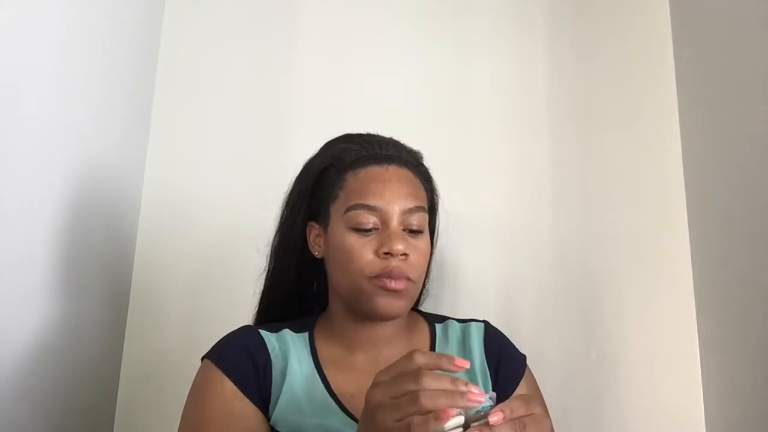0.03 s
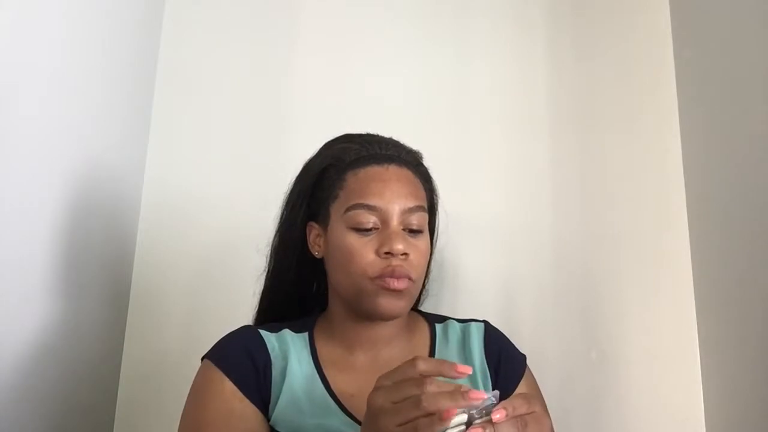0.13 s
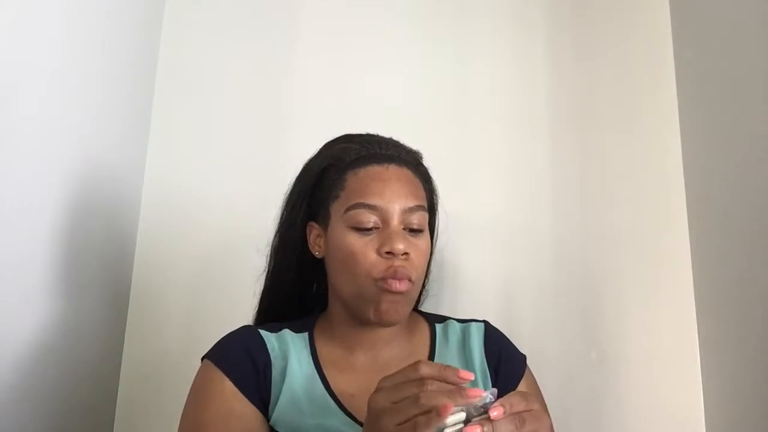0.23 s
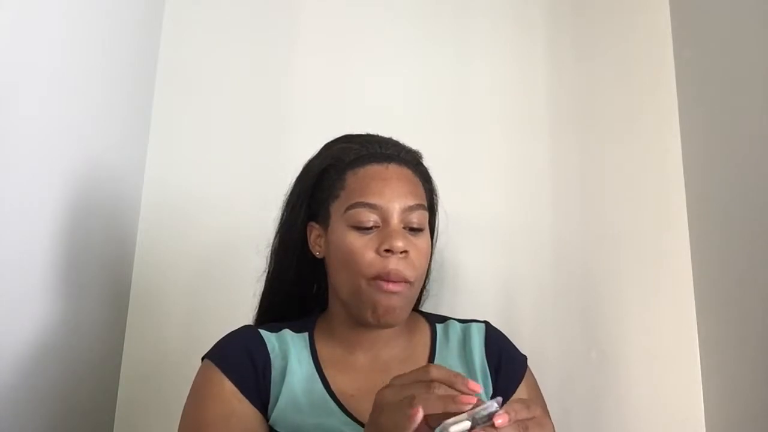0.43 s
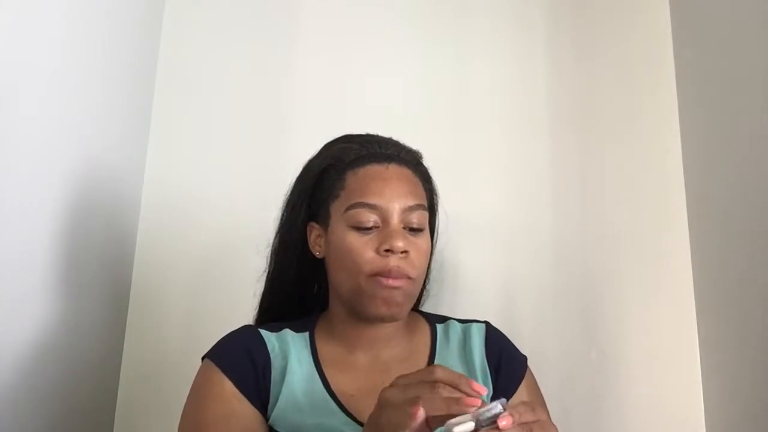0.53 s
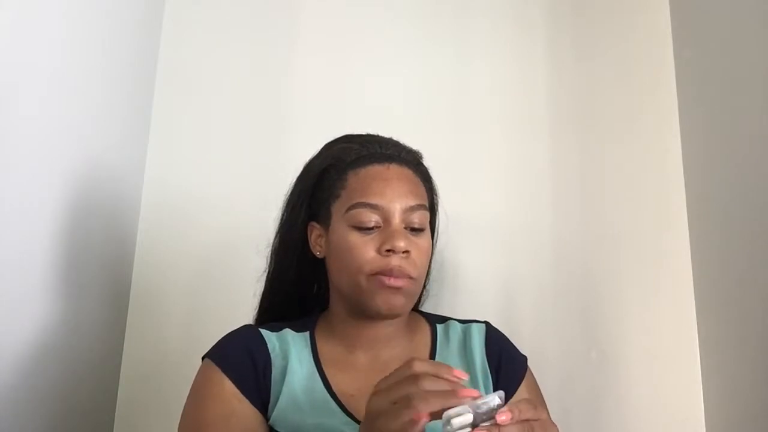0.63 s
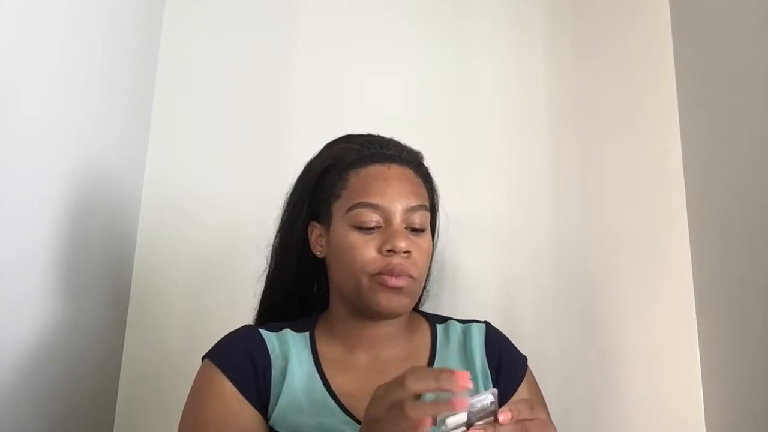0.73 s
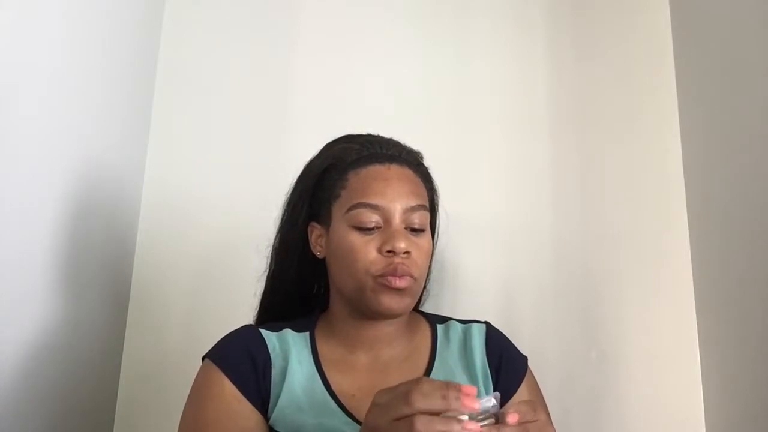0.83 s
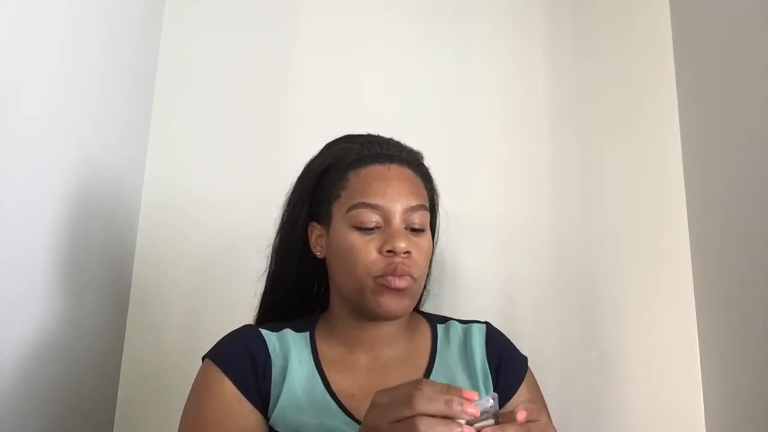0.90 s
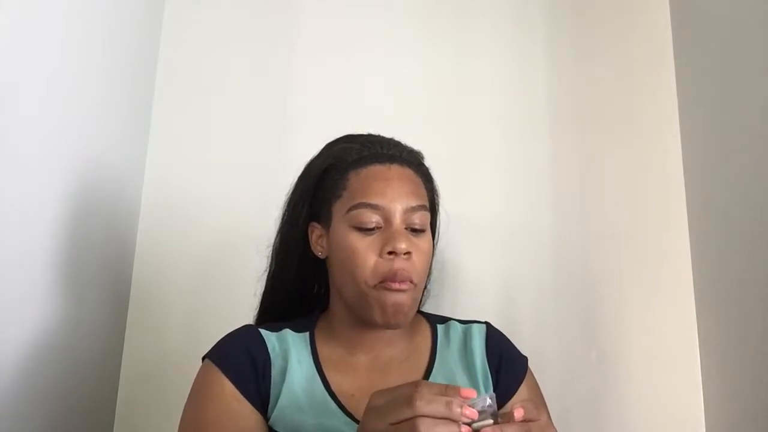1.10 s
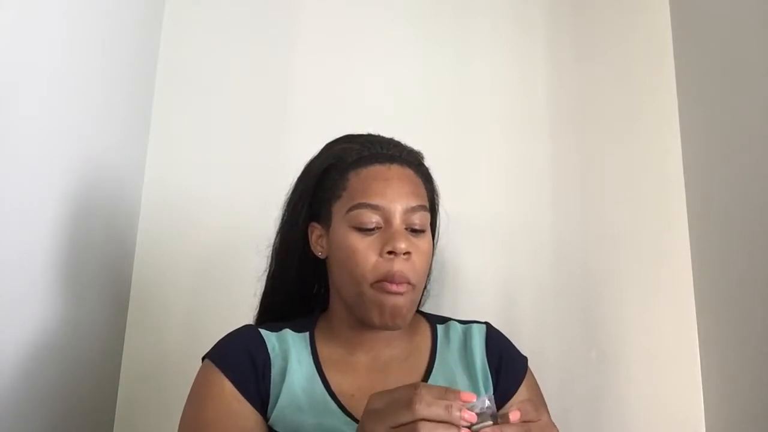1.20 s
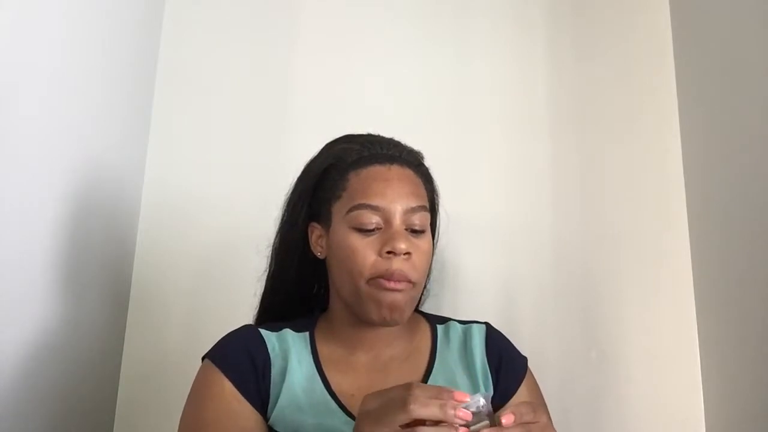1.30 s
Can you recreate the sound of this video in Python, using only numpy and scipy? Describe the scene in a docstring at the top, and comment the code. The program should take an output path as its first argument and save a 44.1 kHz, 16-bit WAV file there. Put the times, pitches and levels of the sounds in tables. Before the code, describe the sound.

Fingers press a plastic and foil pack, its domes buckling in a rapid early burst, then one crisp snap and a final tight pair, with tiny crinkles, short bright room reflections and a faint low rumble.

```python
"""A small, bare room, close to the microphone: fingers press pellets out of a plastic and foil blister pack.
Domes buckle with sharp snaps: noise bursts ring through resonances of their own. Small clicks are creases of
the sheet; showers of grains are foil crinkles and, at the start, the fading end of an earlier sound; two dull
thuds come from handling. Near walls return snaps, clicks and grains as echoes and a tail, over shaped noise and
wavering hums."""
import sys
import numpy as np
from scipy import signal
from scipy.fft import rfft, irfft, next_fast_len
from scipy.io import wavfile

SR = 44100
rng = np.random.default_rng(int(sys.argv[2]) if len(sys.argv) > 2 else 0)


def master_out(mix):
    """Clip the mix to full scale and print it as 16-bit PCM to the path in sys.argv[1]."""
    frames = np.transpose(np.atleast_2d(mix))
    ceiling = np.clip(frames, -1, 1)
    pcm = np.round(ceiling * 32767).astype(np.int16)
    wavfile.write(sys.argv[1], SR, pcm)


N = 59535
TIME = np.arange(N) / SR  # s

# Rumble spectrum, shape only: (frequency [Hz], relative density [dB])
RUMBLE_SPECTRUM = [(25, -29), (40, -25), (55, 1.5), (75, -5), (120, 1.5), (165, -3), (245, -1.5), (330, -3),
                   (380, -7.5), (450, -17), (700, -23.5), (1500, -37)]
# Slow rise and fall of the rumble: (time [s], level change [dB])
RUMBLE_SWELL = [(0, 1), (.2, 0), (.3, 1), (.41, -0.5), (.5, 1), (.75, .5), (1.1, -1), (1.35, 0.5)]
# Hiss spectrum, shape only: (frequency [Hz], relative density [dB])
HISS_SPECTRUM = [(300, -3), (700, 1), (1200, 6), (2500, -2), (5000, -6.5), (10000, -14.5), (15000, -31)]
# Low hums of wavering strength: (frequency [Hz], level [dB])
HUMS = [(47, -62.5), (239, -68)]
RUMBLE_DB, HISS_DB = -57.5, -69
HUM_WAVER, HUM_WAVER_HZ = 0.17, 6.8  # rms share of the level; fastest full-strength waver

# Colour of the plastic and foil: (frequency [Hz], relative level [dB])
PACK_COLOUR = [(150, -31), (500, -19.5), (900, -18.5), (1500, -10.5), (2400, -7.5), (3300, -0.5), (5500, 0),
               (7200, 0), (10000, -1.5), (13500, -2), (16000, -18)]
# The bass lift holds below the first frequency, the treble lift above the last
BASS_FULL_HZ, NEUTRAL_HZ, TREBLE_FULL_HZ = 835, 3340, 13120

# Foil crinkles, and at the start the fading end of an earlier sound:
# (start [s], length [s], level [dB], treble [dB])
CRINKLES = [(0, 0.057, -71.5, 7), (0.127, 0.021, -62.5, 6), (0.551, 0.013, -70, 2), (0.66, .016, -53.5, 5),
            (0.871, 0.014, -60, 0), (0.923, .014, -56.5, 3), (1.012, 0.011, -56.5, 1),
            (1.338, .04, -64, -2)]
GRAINS_PER_S, GRAIN_SPREAD_DB, CRINKLE_EDGE_S = 9900, 4.5, 0.0024

# Small clicks: creases of the sheet: # (time [s], level [dB], energy share of the first break [0-1], treble
# [dB], # resonance [Hz], its height [dB])
SMALL_CLICKS = [ (0.0148, -43, .6, -15, 5960, -3), (.1170, -35, 0.56, 10, 5400, 6),
                (0.159, -30.5, 0.3, 3, 5500, 15), (0.173, -27.5, 0, 1, 4290, 25),
                (0.1842, -34, 0.5, -6, 5600, 9), (.2042, -25, .7, -7, 5130, 4),
                (.2180, -33, 0.3, -5, 5850, 0), (0.2433, -21, 0.27, 2, 8640, 13),
                (0.2677, -30, 1, -8, 4570, -5), (0.2714, -14.5, .4, 30, 5900, 2),
                (0.3017, -32, .3, -3, 8100, 11), (.5610, -43.5, 0.3, 4, 9060, 25),
                (0.6123, -40.5, 0.5, 11, 8600, 14), (0.6196, -32.5, 0.1, -22, 3000, 15),
                (.6297, -24, .05, -11.5, 3330, 12), (.6393, -34.5, 0.05, 0, 3500, 5),
                (0.8386, -32.5, 0.05, -17, 5500, 8), (0.8855, -24, 0.98, -6, 1970, 5),
                (0.8953, -43, 0, -8, 3400, 27), (0.9259, -32.5, 0, 2, 7200, 23),
                (.9825, -44, .5, -8, 3400, 9), (1.0077, -33, 0, 5, 8000, 0), (1.0487, -27, .3, 3, 4700, -6),
                (1.0507, -24, 0.25, 12, 6520, 18), (1.2163, -32, 0.1, -15, 2274, 14.5),
                (1.2702, -48, 0.8, -24, 4700, 30), (1.3199, -37.5, 0, -22, 3330, 6)]
# Peaks and dips of the flat sheet, in every small click: (frequency [Hz], width [Hz], height [dB])
SHEET_RESONANCES = [(2200, 300, 2), (3340, 160, 4.5), (4080, 550, -4), (5030, 510, 3.5), (5720, 250, 2.5),
                    (7640, 700, -4.5), (8700, 400, 5)]
BREAK_S = 0.000237  # decay of the first break
SMALL_CRUMPLE_S, SMALL_WIDTH_HZ = 0.0013, 190

# Near surfaces: (delay [s], level [dB])
ECHOES = [(.0017, -4.5), (.0030, -14), (.0057, -15), (.0094, -7), (0.0102, -7.5), (0.0137, -9.5)]
# Reverberation: (frequency [Hz], time to fall 60 dB [s])
ROOM_T60 = [(500, 0.25), (2200, 0.39), (5500, 0.29), (10000, 0.31), (15000, .3)]
ECHO_SMEAR_S = 0.00097
TAIL_DB, TAIL_START_S, TAIL_BUILD_S = -2.5, 0.0026, 0.0027
SMALL_WALLS_DB = -1  # small clicks and crinkles sent to the walls

# Buckling domes: (time [s], level [dB], crumple decay [s], energy share of the first break [0-1],
#                  level sent to the walls, relative [dB], bass [dB], treble [dB],
#                  peaks and dips as (frequency [Hz], width [Hz], height [dB]))
SNAPS = [ (0.1378, -19, 0.0012, 0.27, 0.5, 0.5, 1.5, [(1930, 270, 10), (2660, 1200, -21), (5520, 490, 10.5),
         (6900, 230, 6.5), (9450, 350, 5), (12000, 1150, 11)]),
         (.1983, -16.5, .0013, 0.33, -3, -9, 9, [(3700, 610, 16), (5170, 700, 1), (12400, 600, 0)]),
         (.2079, -10, 0.0025, 0.22, 0.5, 5.5, 15, [(1460, 160, 15), (1930, 620, -14), (3260, 340, 16),
         (5700, 600, 10), (12700, 400, 3)]), (0.2294, 0, 0.00077, 0.68, -3, -7, -2.5, [(3470, 500, 1),
         (4740, 290, 3), (5690, 570, 13), (7040, 1300, -11), (11640, 1400, 9.5)]),
         (0.2901, -7, 0.00067, .25, 0.5, 6, 4.5, [(550, 73, 6.5), (1000, 470, -3.5), (3430, 400, -4.5),
         (5850, 1100, 5), (6450, 340, -7), (8050, 360, 14), (13200, 1600, 11)]),
         (0.3542, -11, 0.0025, 0.029, -1, -0.5, -5, [(1114, 39, 10), (1505, 63, 6.5), (1940, 310, 11),
         (2213, 160, 13.5), (2680, 1900, -41), (3645, 140, 12.5), (3900, 250, 2.5), (4680, 400, 6),
         (6340, 150, 13.5)]), (.6732, -9, 0.0046, 0.099, -1, -6.5, 9.5, [(1480, 24, 19), (2570, 240, 11),
         (4040, 250, 5.5), (4520, 390, -15), (5620, 480, 7), (11600, 450, 5.5)]),
         (1.0251, -17, 0.003, 0.19, 0, -4, 2.5, [(2460, 410, 11), (4500, 430, 7), (6640, 350, 12.5)]),
         (1.0266, -11, 0.0036, 0.44, -0.5, -5, 6, [(930, 120, 18.5), (1920, 500, 5), (3100, 450, 6),
         (3940, 400, -10), (4450, 390, 9.5), (6480, 200, 6), (8400, 320, 5)])]

# Soft low thuds while the pack is handled: (time [s], level [dB], band centre [Hz])
THUDS = [(0.293, -27.5, 61.3), (.385, -24.5, 209)]
THUD_S, THUD_SPREAD = 0.036, 1.7  # decay; frequency ratio between points of the band

CUTOFF_HZ = 15300


def from_db(db):
    """Decibels to gain."""
    return 10 ** (np.asarray(db) / 20)


def unit(x):
    """Scale to energy one."""
    return x / np.sqrt(np.sum(x ** 2) + 1e-20)


def at_hz(points, hz):
    """Read a table on a log-frequency axis."""
    table_hz, value = np.transpose(points)
    return np.interp(np.log(np.maximum(hz, 1)), np.log(table_hz), value)


def steady_noise(points):
    """Noise with a given spectrum, rms one."""
    gain = from_db(at_hz(points, np.fft.rfftfreq(N, 1 / SR)))
    spectrum = rfft(rng.standard_normal(N)) * gain
    return np.sqrt(N) * unit(irfft(spectrum, N))


def background():
    """Room noise: swelling rumble, faint hiss, and hums whose strength wavers at random."""
    swell_db = np.interp(TIME, *np.transpose(RUMBLE_SWELL))
    rumble = from_db(RUMBLE_DB + swell_db) * steady_noise(RUMBLE_SPECTRUM)
    hiss = from_db(HISS_DB) * steady_noise(HISS_SPECTRUM)
    out = rumble + hiss
    for hz, db in HUMS:
        waver = 1 + HUM_WAVER * steady_noise([(HUM_WAVER_HZ, 0), (HUM_WAVER_HZ * 10, -80)])
        tone = np.sqrt(2) * np.sin(2 * np.pi * (hz * TIME + rng.random()))  # rms one
        out += from_db(db) * waver * tone
    return out


def colour(x, points):
    """Causal (minimum-phase) filter that follows a spectrum."""
    size = 2 * next_fast_len(len(x))
    gain = from_db(at_hz(points, np.fft.rfftfreq(size, 1 / SR)))
    cepstrum = irfft(np.log(gain))
    # Folding the cepstrum forward in time leaves no sound before the impulse
    cepstrum[1:size // 2] *= 2
    cepstrum[size // 2 + 1:] = 0
    return irfft(rfft(x, size) * np.exp(rfft(cepstrum)))[:len(x)]


def shelves(x, bass_db, treble_db):
    """Lift or lower both ends of the spectrum."""
    return colour(x, [(BASS_FULL_HZ, bass_db), (NEUTRAL_HZ, 0), (TREBLE_FULL_HZ, treble_db)])


def crinkles():
    """Foil crinkles, and an earlier sound's fading end: dense, uneven impulses coloured by the pack."""
    out = np.zeros(N)
    for s, length_s, db, treble_db in CRINKLES:
        size_db = GRAIN_SPREAD_DB * np.minimum(rng.exponential(1, N), 4)
        sizes = from_db(size_db) * rng.choice([-1, 1], N)
        impulses = sizes * (rng.random(N) < GRAINS_PER_S / SR)
        grains = shelves(colour(impulses, PACK_COLOUR), 0, treble_db)
        time_to_edge = np.minimum(TIME - s, s + length_s + CRINKLE_EDGE_S - TIME)
        envelope = np.clip(time_to_edge / CRINKLE_EDGE_S, 0, 1)
        out += from_db(db) * np.sqrt(N) * unit(grains) * envelope
    return out


def burst(decay_s, size=2048):
    """Dying noise with a nearly even spectrum, energy one."""
    envelope = np.exp(-TIME[:size] / max(decay_s, 1 / SR))
    x = rng.standard_normal(size) * envelope
    # Alternate between a flat spectrum and a ceiling that dies away
    for _ in range(6):
        x = irfft(np.exp(1j * np.angle(rfft(x))))
        ceiling = envelope * np.std(x[:16]) * 2
        x = x * np.minimum(1, ceiling / (np.abs(x) + 1e-12))
    return unit(x)


def resonate(x, hz, width_hz, height_db):
    """A two-pole resonance raises a peak, or cuts a dip when its height is negative."""
    r = np.exp(-np.pi * width_hz / SR)
    zeros = np.array([1, 0, -1]) * (1 - r * r) / 2
    poles = [1, -2 * r * np.cos(2 * np.pi * hz / SR), r * r]
    peak = signal.lfilter(zeros, poles, x + 1e-18)
    return x + (from_db(height_db) - 1) * peak


def click(crumple_s, break_share, bass_db, treble_db, resonances):
    """A first break and a short crumple ring the plastic; energy one."""
    share = np.clip(break_share, 0, 1)
    first_break = np.sqrt(share) * burst(BREAK_S)
    crumple = np.sqrt(1 - share) * burst(crumple_s)
    x = shelves(colour(first_break + crumple, PACK_COLOUR), bass_db, treble_db)
    for hz, width_hz, height_db in resonances:
        x = resonate(x, hz, width_hz, height_db)
    return unit(x)


def add(out, s, sound):
    """Mix a sound in at a time."""
    start = max(int(s * SR), 0)
    out[start:start + len(sound)] += sound[:max(N - start, 0)]


def small_clicks():
    """Creases: bursts through the sheet's resonances and one more each."""
    out = np.zeros(N)
    for s, db, share, treble_db, hz, height_db in SMALL_CLICKS:
        resonances = SHEET_RESONANCES + [(hz, SMALL_WIDTH_HZ, height_db)]
        add(out, s, from_db(db) * click(SMALL_CRUMPLE_S, share, 0, treble_db, resonances))
    return out


def room(x):
    """Smeared echoes from near surfaces, and a noise tail that dies at its own rate in each band."""
    response = np.zeros(N)
    for delay_s, db in ECHOES:
        add(response, delay_s, from_db(db) * burst(ECHO_SMEAR_S))
    white = rfft(rng.standard_normal(N))
    freqs = np.fft.rfftfreq(N, 1 / SR)
    edges = np.geomspace(200, SR / 2, 14)
    tail = np.zeros(N)
    for low, high in zip(edges, edges[1:]):
        band = irfft(white * ((freqs >= low) & (freqs < high)), N)
        t60 = at_hz(ROOM_T60, np.sqrt(low * high))
        tail += band * from_db(-60 * TIME / t60)
    build = np.clip((TIME - TAIL_START_S) / TAIL_BUILD_S, 0, 1)
    response += from_db(TAIL_DB) * unit(tail * build)
    return signal.fftconvolve(x, response)[:N]


def snaps():
    """The domes give way: the sound sent to the microphone, and that sent to the walls."""
    direct, to_walls = np.zeros((2, N))
    for s, db, crumple_s, share, walls_db, bass_db, treble_db, resonances in SNAPS:
        sound = from_db(db) * click(crumple_s, share, bass_db, treble_db, resonances)
        add(direct, s, sound)
        add(to_walls, s, from_db(walls_db) * sound)
    return direct, to_walls


def thuds():
    """Short, dull bumps: dying noise narrowed to a low band."""
    out = np.zeros(N)
    for s, db, hz in THUDS:
        band = [(hz / THUD_SPREAD ** 2, -30), (hz / THUD_SPREAD, -8), (hz, 0),
                (hz * THUD_SPREAD, -10), (hz * THUD_SPREAD ** 3, -60)]
        add(out, s, from_db(db) * unit(colour(burst(THUD_S, size=8192), band)))
    return out


def scene():
    """The pack before the microphone, with the walls' reply and the room noise."""
    direct, to_walls = snaps()
    small = small_clicks() + crinkles()
    walls = room(to_walls + from_db(SMALL_WALLS_DB) * small)
    return (direct + small + thuds() + walls + background())[None]


def record(dry):
    """The top is cut steeply by an elliptic low-pass."""
    low_pass = signal.ellip(10, 0.2, 70, CUTOFF_HZ, fs=SR, output="sos")  # ripple, rejection [dB]
    return signal.sosfilt(low_pass, dry)


dry = scene()
out = record(dry)
master_out(out)
```